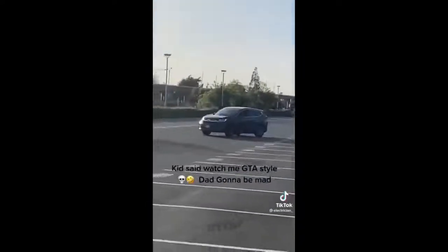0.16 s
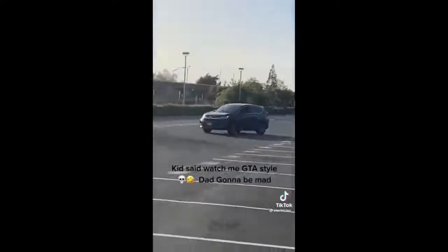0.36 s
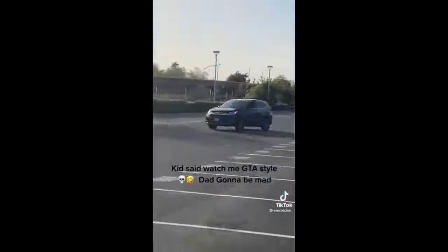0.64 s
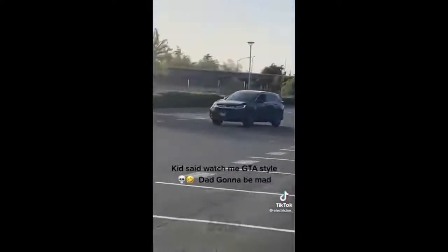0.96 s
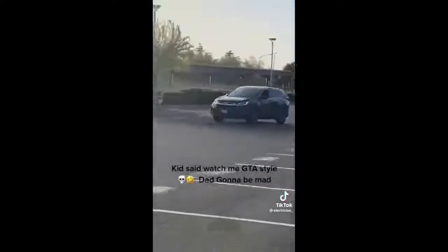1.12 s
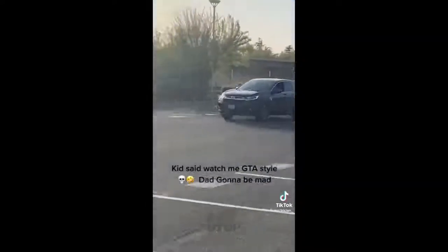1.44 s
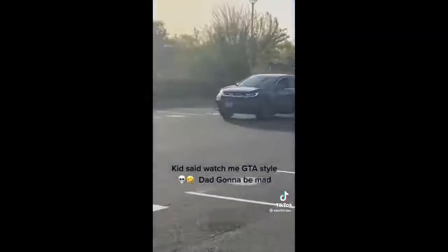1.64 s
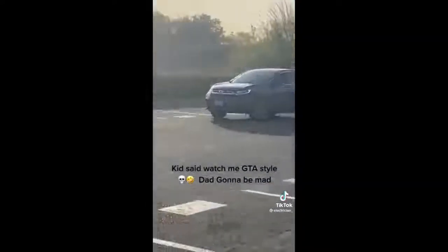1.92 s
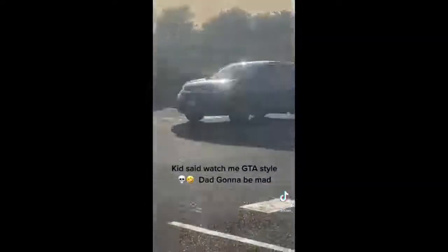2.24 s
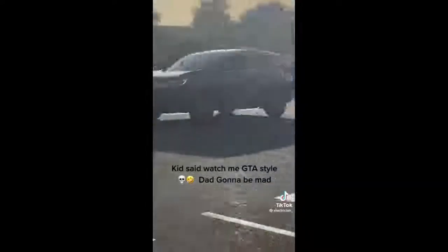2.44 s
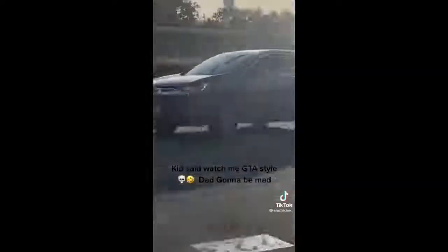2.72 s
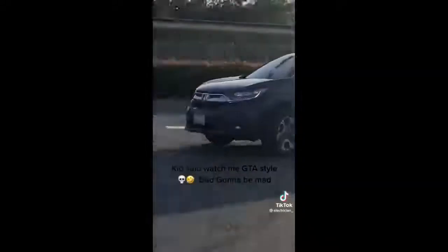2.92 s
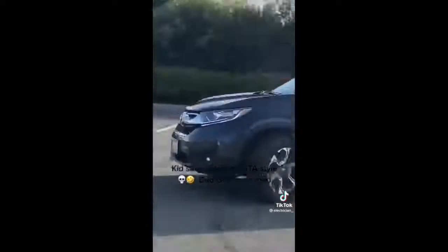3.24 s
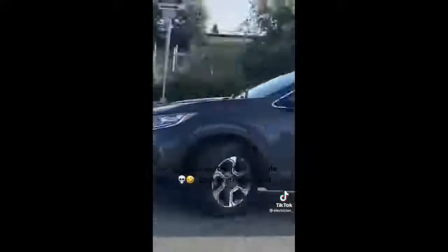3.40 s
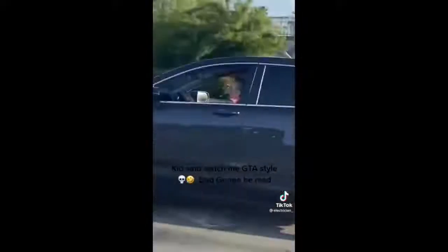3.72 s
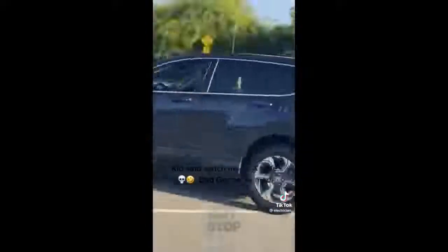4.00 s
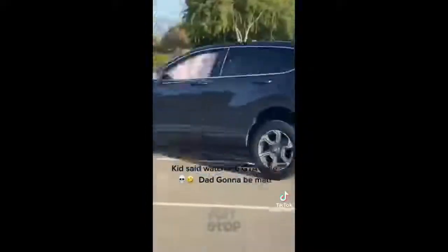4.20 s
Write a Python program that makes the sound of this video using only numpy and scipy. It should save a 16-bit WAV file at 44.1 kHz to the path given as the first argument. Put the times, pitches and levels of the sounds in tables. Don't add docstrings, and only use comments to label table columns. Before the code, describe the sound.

Swelling road noise and a rising engine lead into a harsh tyre screech, ended by a sudden loud crash of crumpling car panels.

```python
import sys
import numpy as np
from scipy import signal
from scipy.fft import rfft, irfft, next_fast_len
from scipy.io import wavfile
from scipy.ndimage import uniform_filter1d, map_coordinates

SR = 44100
rng = np.random.default_rng(int(sys.argv[2]) if len(sys.argv) > 2 else 0)


def level_to_linear(level):
    exponent = np.asarray(level, float) / 20
    return 10 ** exponent


def master_out(mix):
    frames = np.transpose(np.atleast_2d(mix))
    ceiling = np.clip(frames, -1, 1)
    pcm = np.round(ceiling * 32767).astype(np.int16)
    wavfile.write(sys.argv[1], SR, pcm)


N = 192276
T = np.arange(N) / SR

# t/s, slip pitch f/Hz, level/dB
ALL_TYRES_SLIDE = [(2.09, 1262, -37), (2.2, 1191, -27.5), (2.36, 1140, -20), (2.45, 1141, -23),
                   (2.65, 1117, -18.5), (2.84, 1054, -23), (2.9, 1080, -22), (3.0, 1004, -21),
                   (3.06, 1188, -21)]
# t/s, slip pitch f/Hz, level/dB
ONE_TYRE_SLIDES = [(3.175, 1097, -18.5), (3.22, 1047, -21.5), (3.499, 967.2, -23.5), (3.64, 1003, -23.5),
                   (3.701, 917.4, -26), (3.808, 995.4, -23.5), (3.889, 1000, -26), (3.952, 981, -27),
                   (4.127, 966.6, -31)]
# t/s, extra level/dB, pitch jump/fraction
GRABS = [
    (2.405, 6, .0),
    (2.66, 4, .0),
    (3.0, 5, -.03),
    (3.2, -6, 0),
    (3.47, -4, -.025),
    (3.632, 2, .08),
    (3.795, 2, .08),
    (3.885, 0, .03),
    (4.035, -2, -.045),
]
# multiple of slip pitch, level under the third/dB
UPPER_MULTIPLES = [(4, -8), (5, -13)]
PATCH_OFFSETS = [0, -.045, .015, .045]

# t/s, level/dB
CRUSH_FORCE = [(4.118, -44), (4.134, -24.5), (4.163, -18.5), (4.172, -11), (4.197, -15.5), (4.213, -24.5),
               (4.248, -35.5), (4.267, -30.5), (4.3, -43.5)]
# t/s, peak level/dB
IMPACT_BLOWS = [
    (4.131, -28),
    (4.137, -6),
    (4.155, -6.5),
    (4.169, 7.5),
    (4.174, -7),
    (4.179, -34),
    (4.189, -11),
    (4.2, -2),
    (4.266, -19.5),
]
# t/s, peak level/dB
SHARP_CRACKS = [
    (4.1672, -5),
    (4.175, -8),
    (4.1795, -11),
    (4.1982, -20),
]
# f/Hz, level/dB, t60/s
SHELL_BOOMS = [(98, -23, .2), (165, -23, .16), (310, -19, .13), (660, -21, .08)]
# f/Hz, density/dB per Hz
BODY_SPECTRUM = [(24, -39), (40, -16), (102, 0), (156, -5), (314, -6.5), (396, -20), (500, -11.5),
                 (650, -34), (1100, -120)]
# f/Hz, density/dB per Hz
PANEL_SPECTRUM = [(240, -42), (400, -18), (659, -1.5), (805, -7), (881, -5.5), (1220, -14), (1660, -14),
                  (2160, -16), (3500, -18.5), (4550, -49), (7700, -120)]
# f/Hz, density/dB per Hz
GRIT_SPECTRUM = [(2000, -35), (3000, -13), (3700, -4.5), (5400, -5.5), (6500, -13), (8000, -8.5),
                 (11000, -16.5), (15400, -11.5), (15700, -71)]

# t/s, nearness level/dB
NEARNESS = [(0, -15), (.3, -17.5), (.7, -14), (1.0, -10), (1.2, -9), (1.45, -6), (1.9, -2.5), (2.2, 1),
            (2.5, -2), (3.0, -3), (3.6, -2.5), (4.08, -3), (4.36, -4)]
# f/Hz, density/dB per Hz
RUMBLE_SPECTRUM = [(15, -37), (25, 0.5), (64, 1.5), (123, 0.5), (177, -5.5), (215, -4), (258, -7.5),
                   (450, -17.5), (580, -55), (990, -120)]
# f/Hz, density/dB per Hz
ROAR_SPECTRUM = [(210, -26), (350, -4), (430, -10), (520, -2), (760, -2.5), (950, -5.5), (1200, -9),
                 (1760, -10), (1900, -22), (2600, -33), (5000, -120)]
# f/Hz, density/dB per Hz
SCRUB_SPECTRUM = [(760, -16), (1300, -5), (1650, -7.5), (1900, -5.5), (2500, -12.5), (3070, -13.5),
                  (4820, -20.5), (6210, -27.5), (7000, -83), (9000, -120)]
# f/Hz, density/dB per Hz
HISS_SPECTRUM = [(5000, -65), (6300, -6), (7000, -4), (8200, 2), (9400, -9), (10700, -6.5), (12500, -10.5),
                 (13700, -13), (15300, -14), (15700, -68)]
# from t/s, to t/s, level/dB
TREAD_SCUFFS = [
    (0.407, .85, -54.5),
    (1.718, 2.248, -41),
]

# t/s, f/Hz, level/dB
FIRING_NOTE = [(1.5, 116, -46), (1.7, 124.2, -36.5), (2.25, 150.5, -25.5), (2.42, 160.3, -25.5),
               (2.75, 166.6, -28), (2.9, 170.9, -32), (3.0, 154.8, -27), (3.1, 144, -29)]
# multiple of the firing note, level/dB
FIRING_MULTIPLES = [(1, 0), (2, -64), (3, -29)]
# multiple of the firing note, from t/s, to t/s, level/dB
INTAKE_HOWLS = [(3, 1.63, 2.2, -45), (4, 1.92, 2.34, -43.5)]
# from t/s, to t/s, f/Hz, level/dB
STEADY_HUMS = [
    (0.023, .4, 214, -41.5),
    (3.55, 4.124, 115.4, -47),
]

# t/s, peak level/dB, top f/Hz, length/s
MIC_THUMPS = [(2.407, -13, 386, 0.034), (2.578, -14, 397, 0.0072), (2.785, -16, 203.1, 0.017),
              (2.865, -13, 410.3, 0.052), (2.96, -12.5, 341, 0.06), (2.996, -18.5, 269, 0.093),
              (3.092, -13.5, 507, 0.04), (3.126, -20, 152, 0.057), (2.01, -30, 90, 0.048),
              (2.291, -18, 103, 0.077), (3.214, -36.5, 184, 0.033), (3.486, -43, 100, 0.05)]
# f/Hz, likeness/0-1
GUST_LIKENESS = [(100, .78)]
# f/Hz, likeness/0-1
PORT_LIKENESS = [(60, 0.96), (130, 1), (290, 0.47), (640, 0.65), (1000, 0.93), (2400, 1), (4400, 0.85),
                 (6000, 0), (8000, 0), (10000, 0), (14000, 0)]
# f/Hz, left over right level/dB
PORT_LEAN = [(200, 0), (700, -1), (1100, -3), (1600, -2.5), (2200, 1), (4000, 0)]
# f/Hz, left lead/rad
PORT_LEAD = [(300, -0.59), (950, -0.47), (1500, -0.35), (2400, 0.67), (3000, 0.5)]

# low f/Hz, high f/Hz, share kept/0-1
PATCHY_BANDS = [(6350, 6700, .45), (7550, 7950, .45), (8700, 9600, .8), (11300, 11950, .04),
                (13100, 13600, .55), (13600, 14200, .75)]
# from t/s, to t/s
BAND_OPEN = [(.13, .42), (.6, .66), (2.44, 2.5), (2.74, 2.86), (2.97, 3.04), (3.1, 3.15), (3.19, 3.43),
             (3.8, 3.98), (4.02, 4.07), (4.14, 4.22)]
# low f/Hz, high f/Hz
MONO_BANDS = [(1400, 1900), (2900, 4250), (4700, 5500), (7600, 8300), (9600, 11900), (12300, 13700),
              (14300, 16000)]
# low f/Hz, high f/Hz, threshold level/dB
MONO_IF_QUIET = [(0, 170, -33), (1900, 2900, -47)]


def unit(x):
    return x / np.sqrt(np.mean(x ** 2) + 1e-20)


def along(points, hz):
    f, v = np.transpose(points)
    return np.interp(np.log(hz + 1), np.log(f + 1), v)


def curves(rows):
    s, *cols = np.transpose(rows)
    gate = np.interp(T, [s[0] - .03, s[0], s[-1], s[-1] + .02], [0, 1, 1, 0])
    return [np.interp(T, s, c) for c in cols] + [gate]


def wobble(rate):
    return map_coordinates(rng.standard_normal(N // 40), [T * np.clip(rate, .1, 1000)])


def filtered(x, response):
    m = next_fast_len(N + 8192)
    return irfft(rfft(x, m) * response(np.fft.rfftfreq(m, 1 / SR)), m)[..., :N]


def rush(spectrum, patchy_db, grain_db=0, alike=PORT_LIKENESS):
    z = signal.stft(rng.standard_normal((2, N)), nperseg=512)[2]
    field = uniform_filter1d(rng.standard_normal(z.shape[1:]), size=6, axis=0)
    field = uniform_filter1d(field, size=10, axis=1)
    pair = signal.istft(z * level_to_linear(patchy_db * unit(field)), nperseg=512)[1][:, :N]
    pair = pair * level_to_linear(grain_db * wobble(300))

    def mid_side_response(hz):
        angle = np.arccos(np.clip(along(alike, hz), -1, 1)) / 2
        return level_to_linear(along(spectrum, hz)) * (hz > spectrum[0][0]) * [np.cos(angle), np.sin(angle)]

    mid, side = filtered(pair, mid_side_response)
    return unit(np.array([mid + side, mid - side]))


def slide():
    leads = np.interp(T, (3.05, 3.24), [0, 1])
    first_bite = np.interp(T, (2.0, 2.25), [.8, 0])
    return *curves(ALL_TYRES_SLIDE + ONE_TYRE_SLIDES), leads, np.maximum(leads, first_bite)


def squeal():
    hz, db, gate, leads, clear = slide()
    rough_bite, clean_bite = (.55, .022, .5), (.84, .010, .3)
    share, spread, fuzz = [a + (b - a) * clear for a, b in zip(rough_bite, clean_bite)]
    octave_enters = np.clip((2.19 - T) / 0.046, 0, 1)
    octave_db = -2 + 3 * leads - 14 * octave_enters + 0.67 * wobble(29.7)
    third_db = -24 + 11 * leads + 3.0 * wobble(14)

    grabs = [np.exp(-((T - s) / 0.007626) ** 2) for s, _, _ in GRABS]
    db = db + sum(g * extra_db for g, (_, extra_db, _) in zip(grabs, GRABS))
    hz = hz * (1 + sum(g * jump for g, (_, _, jump) in zip(grabs, GRABS)))
    average_hz = uniform_filter1d(hz, size=int(.22 * SR))

    partials = np.zeros((len(UPPER_MULTIPLES) + 3, 2, N))
    for offset in PATCH_OFFSETS:
        if offset:
            patch_hz = average_hz
            drift = offset + (.014 + .4 * spread) * (wobble(35) + wobble(120))
            weight = np.sqrt((1 - share) / (len(PATCH_OFFSETS) - 1))
        else:
            patch_hz, drift, weight = hz, spread * wobble(60), np.sqrt(share)
        phase = 2 * np.pi * np.cumsum(patch_hz * (1 + drift)) / SR
        flare = weight * level_to_linear(1.28 * wobble(45))
        skew = 0.033 * rng.standard_normal() * np.array([[1], [-1]])
        for k in range(len(partials)):
            rough = fuzz / (k + 1) if k < 2 else .55
            skirts = wobble(260) + 1j * wobble(260)
            ragged = np.sqrt(1 - rough) + np.sqrt(rough / 2) * skirts
            wave = np.imag(ragged * np.exp(1j * ((k + 1) * phase + skew)))
            partials[k] += flare * level_to_linear(2.76 * wobble(35)) * wave

    top_fade_db = np.interp(T, (3.6, 4.1), [0, -7])
    levels = [db, db + octave_db, db + third_db]
    levels += [db + third_db + under_db + top_fade_db for _, under_db in UPPER_MULTIPLES]
    tone = gate * sum(level_to_linear(level + 1.34) * unit(p) for level, p in zip(levels, partials))
    return filtered(tone, lambda f: 1 / (1 + (700 / (f + 1)) ** 12))


def crash():
    rattle = [(4.32, -31.5), (4.36, -31.5)]
    force_db, gate = curves(CRUSH_FORCE + rattle)
    under_full_db = force_db - force_db.max()
    body_db = -13 + 0.66 * under_full_db
    panel_db = -10.5 + 1.09 * under_full_db
    grit_db = -23 + 0.85 * under_full_db

    loudest = max(db for _, db in IMPACT_BLOWS)
    snaps, boom = np.zeros(N), np.zeros(N)
    for s, db in IMPACT_BLOWS:
        snaps += level_to_linear(db - loudest - 60 * np.abs(T - s) / np.where(T > s, .02, .002))
        t = np.maximum(T - s, 0)
        for hz, level_db, t60 in SHELL_BOOMS:
            ring_db = db + level_db + rng.normal(0, 1.6) - 60 * t / t60
            boom += level_to_linear(ring_db) * np.sin(2 * np.pi * hz * t)

    body = level_to_linear(body_db) * rush(BODY_SPECTRUM, patchy_db=7.5, alike=GUST_LIKENESS)
    panel = level_to_linear(panel_db - 3.0) * (1 + 1.2 * snaps) * rush(PANEL_SPECTRUM, patchy_db=0.0, grain_db=-1.0)
    grit = level_to_linear(grit_db + 1.0) * (1 + 0.76 * snaps) * rush(GRIT_SPECTRUM, patchy_db=4.0, grain_db=1.0)
    crack_s = 0.0022
    breaks = sum(level_to_linear(db - 20 * np.maximum(T - s, 0) / crack_s) * (T > s) for s, db in SHARP_CRACKS)
    cracks = filtered(breaks * rng.standard_normal(N), lambda hz: 1 / (1 + 1j * hz / 3500))
    return gate * (body + panel + grit) + boom + level_to_linear(1.5) * cracks


def road():
    near_db, _ = curves(NEARNESS)
    _, squeal_db, sliding, leads, _ = slide()
    squeal_db = squeal_db - 1.5 * leads
    lifted = np.clip((T - 3.097) / 0.13, 0, 1)
    stopped = np.clip((T - 4.14) / .05, 0, 1)

    def layer(top_db, slope, lift_db, slide_db, rest_db):
        rolling = level_to_linear(top_db + slope * near_db + lift_db * lifted)
        moving = np.hypot(rolling, sliding * level_to_linear(squeal_db + slide_db))
        return (1 - stopped) * moving + stopped * level_to_linear(rest_db)

    lumps = level_to_linear(.8 * wobble(5) + 0.27 * wobble(22.13))
    rumble = layer(-31.5, 0.3, -20.5, -60, -41.5) * unit(lumps * rush(RUMBLE_SPECTRUM, patchy_db=-2.14))
    roar = layer(-38, 1, -13, -35, -44.5) * level_to_linear(4.5 + .7 * wobble(6))
    roar = roar * rush(ROAR_SPECTRUM, patchy_db=2.0, grain_db=2.0)

    scuffs = np.zeros(N)
    for (start, end, db), rise in zip(TREAD_SCUFFS, (0.16, 0.64)):
        peak = start + rise * (end - start)
        scuffs += level_to_linear(db) * np.interp(T, [start, peak, end + 0.061], [0, 1, 0]) ** 2
    scrub = np.hypot(layer(-52.5, .5, -3, -11.5, -50.5), scuffs) * level_to_linear(6.5 + .9 * wobble(8.08))
    scrub = scrub * rush(SCRUB_SPECTRUM, patchy_db=1.23, grain_db=0.97)
    hiss = layer(-57.5, 0.95, -14.5, -33, -55) * level_to_linear(6.5 + 1.7 * wobble(9.7))
    hiss = hiss * rush(HISS_SPECTRUM, patchy_db=1.0, grain_db=0.0)
    return rumble + roar + scrub + hiss


def note(rows, orders):
    hz, db, gate = curves(rows)
    phase = 2 * np.pi * np.cumsum(hz * (1 + 0.0073 * wobble(30.16))) / SR
    tone = sum(level_to_linear(level_db + 1.7 * wobble(8.7) * (k > 1)) * np.sin(k * phase) for k, level_db in orders)
    return np.sqrt(2) * gate * level_to_linear(db + 1.3 * wobble(15)) * tone


def held(start, end, hz, db):
    edge_s, edge_db = .07, -9
    times = [start, start + edge_s, *np.linspace(start, end, 8)[2:-2], end - edge_s, end]
    rows = [(s, np.interp(s, T, hz), db + edge_db * (s in (start, end))) for s in times]
    return note(rows, [(0.99, 0.0066)])


def engine():
    firing_hz = curves(FIRING_NOTE)[0]
    howls = sum(held(start, end, round(k) * firing_hz, db) for k, start, end, db in INTAKE_HOWLS)
    hums = sum(held(start, end, hz + 0 * T, db) for start, end, hz, db in STEADY_HUMS)
    return note(FIRING_NOTE, FIRING_MULTIPLES) + howls + hums


def thumps():
    out = np.zeros((2, N))
    for s, db, top_hz, length in MIC_THUMPS:
        spectrum = [(25, -30), (70, 0), (top_hz / 2, -3), (top_hz, -12), (2 * top_hz, -40), (4 * top_hz, -120)]
        low = rush(spectrum, patchy_db=3.5, alike=GUST_LIKENESS)
        swell = np.exp(-((T - s) / (0.8 * length)) ** 2)
        out += level_to_linear(db - 7.0) * swell * low / np.sqrt(np.sum((swell * low) ** 2) / np.sum(2 * swell ** 2))
    return out


def scene():
    return squeal() + crash() + road() + engine() + thumps()


def starved(x):
    hz, t, z = signal.stft(x, SR, nperseg=2048, noverlap=1024)
    narrow = [(low, low + 350, .9) for low in range(7950, 15600, 350)]
    for low_hz, high_hz, kept in PATCHY_BANDS + narrow:
        chance = wobble(14)[np.minimum(t * SR, N - 1).astype(int)]
        z[:, (hz > low_hz) & (hz < high_hz)] *= chance < np.quantile(chance, kept)
    z[:, (hz > 6700) & (hz < 7550)] *= sum((t > start) & (t < end) for start, end in BAND_OPEN)
    treble = hz > 6350
    z[:, treble] *= unit(level_to_linear(6 * rng.standard_normal(z.shape[1:])))[treble]
    return signal.istft(z, SR, nperseg=2048, noverlap=1024)[1][:, :N]


def folded(x):
    hz, t, z = signal.stft([x[0] + x[1], x[0] - x[1]], SR, nperseg=2048, noverlap=1024)
    for low_hz, high_hz in MONO_BANDS:
        z[1, (hz > low_hz) & (hz < high_hz)] = 0
    for low_hz, high_hz, least_db in MONO_IF_QUIET:
        band = (hz >= low_hz) & (hz < high_hz)
        loudness = uniform_filter1d(np.linalg.norm(z[0, band], axis=0), size=5) / 2
        z[1, band] *= loudness > level_to_linear(least_db)
    mid, side = signal.istft(z, SR, nperseg=2048, noverlap=1024)[1][:, :N] / 2
    return np.array([mid + side, mid - side])


def band_limit(x):
    return signal.sosfilt(signal.butter(12, 15620, fs=SR, output="sos"), x)


def record(dry):
    ports = np.array([[.5], [-.5]])

    def port_response(hz):
        low_cut = 1 + (34 / (hz + 1)) ** 4
        return level_to_linear(along(PORT_LEAN, hz) * ports) * np.exp(1j * along(PORT_LEAD, hz) * ports) / low_cut

    shaded = filtered(dry, port_response)
    limited = shaded / (1 + np.abs(shaded / .92) ** 4) ** (1 / 4)
    return band_limit(folded(starved(limited)))


dry = scene()
out = record(dry)
master_out(out)
```